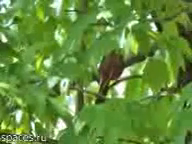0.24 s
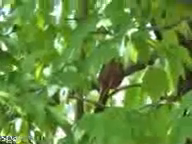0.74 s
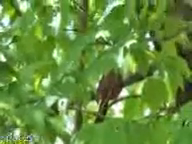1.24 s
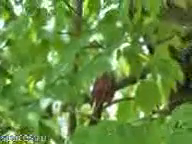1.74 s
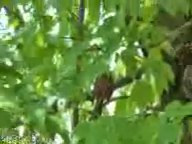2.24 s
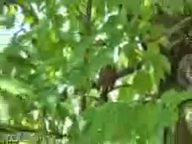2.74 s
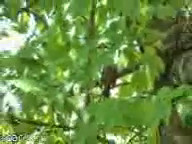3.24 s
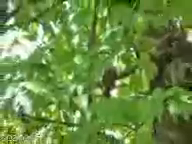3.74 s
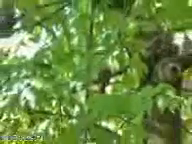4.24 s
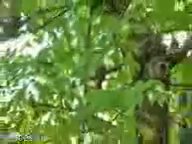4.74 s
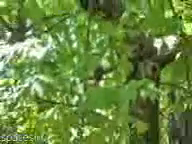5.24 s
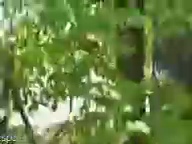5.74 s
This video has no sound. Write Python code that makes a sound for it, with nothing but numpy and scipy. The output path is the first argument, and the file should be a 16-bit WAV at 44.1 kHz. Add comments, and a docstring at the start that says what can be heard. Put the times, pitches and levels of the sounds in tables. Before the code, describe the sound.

Soft distant rumble and rustling leaves, with brief far yelps at the start. After about a second a loud, clear bird begins: three high whistled slurs, then six lower ones at a steady faster pace, with short woodland echoes. Dull knocks on the handheld microphone interrupt lightly midway. As the song finishes, a breathy hiss swells, brightens and dies away.

```python
"""Cardinal in a leafy tree

A cardinal close to the microphone sings nine slurred whistles: three high opening ones, then six lower, quicker ones.
Each is a low rising tone from one side of the syrinx and a falling slur from the other; trunks and leaves scatter them.
Far off are three yelps and filtered-noise rumble and rustle, with a faint hum; housing bumps ring in damped modes.
Two twigs tick as short bursts of noise, and a hiss of resonant noise swells after the song."""
import sys
import numpy as np
from scipy import signal
from scipy.fft import rfft, irfft
from scipy.io import wavfile
from scipy.ndimage import uniform_filter1d, map_coordinates

SR = 44100
rng = np.random.default_rng(int(sys.argv[2]) if len(sys.argv) > 2 else 0)


def dump(signal):
    """Clip the signal to [-1, 1] and save it as 16-bit WAV at the path in sys.argv[1]."""
    limited = np.clip(np.atleast_2d(signal).T, -1, 1)
    pcm = np.round(limited * 32767).astype(np.int16)
    wavfile.write(sys.argv[1], SR, pcm)


N = 262747
T = np.arange(N) / SR


def undb(db):
    """Decibels to gain."""
    return 10 ** (np.asarray(db) / 20)


def unit(x):
    """Scale to rms 1."""
    return x / np.sqrt(np.mean(x ** 2))


def curves(rows, at):
    """Every column of a table after the first, joined by straight lines."""
    first, *columns = np.transpose(rows)
    return [np.interp(at, first, column) for column in columns]


def smooth(x, seconds):
    """Round the corners of a control with two moving averages."""
    size = max(int(seconds * SR), 1)
    once = uniform_filter1d(x, size, mode="nearest")
    return uniform_filter1d(once, size, mode="nearest")


def walk(rate_hz, count=N):
    """Slow chance with a spread near 1: random points joined by straight lines."""
    at = np.arange(count) * rate_hz / SR
    return np.interp(at, np.arange(2048), rng.standard_normal(2048))


def band(x, hz, width_hz):
    """One resonance, gain 1 at its centre."""
    return signal.lfilter(*signal.iirpeak(hz, hz / width_hz, fs=SR), x)


def fade(t, t60):
    """Exponential decay that falls 60 dB in t60 seconds."""
    return np.exp(-np.log(1000) * t / t60)


def hump(x, centre, width):
    """A bell curve of height 1."""
    return np.exp(-((x - centre) / width) ** 2)


def ramp(x, start, end):
    """A straight climb from 0 to 1."""
    return np.clip((x - start) / max(end - start, 1e-6), 0, 1)


def add(out, start, x):
    """Mix a short sound in at its time, cutting off what falls outside."""
    i = int(start * SR)
    x, i = x[max(-i, 0):], max(i, 0)
    out[i:i + len(x)] += x[:N - i]


# Spectrum of the distant outdoor noise: (frequency [Hz], relative density [dB])
AIR_SPECTRUM = [(30, -28), (60, -22.5), (112, -8), (170, -7.5), (240, -5), (450, -4.5), (814, -6.5),
                (1750, -9), (2490, -17), (2850, -17.5), (3400, -22), (5000, -23), (5800, -43), (6600, -50),
                (8000, -80.5)]
# Swells of the faint hum, before its flicker: (start [s], length [s], rms level [dB])
HUM_SWELLS = [(2.255, 0.95, -66), (4.613, .3, -58.5), (5.51, .6, -57)]


def outdoors(rumble_hz=580, rustle_hz=1300, flicker_db=3.0, air_db=-51, hum_hz=117, hum_edge_s=0.056):
    """Distant rumble, middle and leaf rustle: bands of one noise that drift apart, with an unsteady hum."""
    hz, db = np.transpose(AIR_SPECTRUM)
    f = np.fft.rfftfreq(N, 1 / SR) + 1
    colour = undb(np.interp(np.log(f), np.log(hz), db))
    air = undb(air_db) * unit(irfft(rfft(rng.standard_normal(N)) * colour, N))

    # Split at the two edges
    spectrum = rfft(air)
    rumble, body = (irfft(spectrum / (1 + (f / edge) ** 10), N) for edge in (rumble_hz, rustle_hz))
    middle, rustle = body - rumble, air - body

    # The rumble grows, the middle sinks, the leaves rustle in one slow gust
    rumble_db = 0.2 + 0.7653 * T
    middle_db = 2.5 - 1.4 * T
    rustle_db = -2.5 + 6 * hump(T, 2.83, 1.9)
    layers = (rumble, rumble_db), (middle, middle_db), (rustle, rustle_db)
    noise = sum(part * undb(level_db + flicker_db * walk(8)) for part, level_db in layers)

    hum_phase = 2 * np.pi * np.cumsum(hum_hz * (1 + .02 * walk(26))) / SR
    swells = np.zeros(N)
    for start, length, level_db in HUM_SWELLS:
        from_edge = np.minimum(T - start, start + length - T)
        swells += undb(level_db) * ramp(from_edge, 0, hum_edge_s)
    return noise + np.sqrt(2) * np.sin(hum_phase) * swells * undb(2 * walk(9.8))


def rise(length, top_hz, db, climb_hz, hold, crest, bend, base_db,
         attack, attack_db, accent_db, accent_at, accent_width):
    """Pitch and level of a note that starts low and climbs to its top, with one accent or dip in level."""
    u = np.linspace(0, 1, int(length * SR))
    hz = top_hz - climb_hz * (1 - ramp(u, hold, crest) ** bend)
    onset_db = -attack_db * (1 - ramp(u, 0, attack))
    return hz, db + base_db + onset_db + accent_db * hump(u, accent_at, accent_width)


def whistle(hz, db, hoarse, hoarse_s=0.02, waver=0.0057, wobble=0.0052, wobble_db=3.5,
            overtone_db=-39, beak_hz=4900, beak_width_hz=800):
    """A nearly pure tone from vibrating membranes that follows its pitch and level, never twice quite alike."""
    t = T[:len(hz)]
    hz = smooth(hz, 0.0033) * (1 + wobble * walk(58.8, len(t)))
    # The membranes flutter as they start, then settle
    flutter = hoarse * hump(t, 0, hoarse_s) * walk(900, len(t))
    unsteady_hz = hz * (1 + flutter + waver * walk(250, len(t)))
    phase = 2 * np.pi * np.cumsum(unsteady_hz) / SR
    from_edge = np.minimum(t, t[-1] - t)
    edges = np.sin(np.pi / 2 * ramp(from_edge, 0, 0.0027)) ** 2
    # Overtones get out only while they cross the resonance of the beak
    overtones = sum(hump(k * hz, beak_hz, beak_width_hz) * np.sin(k * phase) for k in (2, 3))
    loudness = undb(db + wobble_db * walk(90.3, len(t)))
    return np.sqrt(2) * loudness * edges * (np.sin(phase) + undb(overtone_db) * overtones)


# Far yelps: (start [s], length [s], top pitch [Hz], level before the yelp's shape [dB])
YELPS = [(-.06, 0.063, 1923, -33.5), (0.248, 0.066, 1899, -41), (1.226, 0.06, 1854, -45.5)]
# Shape of a yelp, which breaks upwards and is weakest in the break: climb_hz [Hz], bend [power],
# hold, crest, attack, accent_at, accent_width [shares of the note], base_db, attack_db, accent_db [dB]
YELP_RISE = dict(climb_hz=345.3, hold=.15, crest=.76, bend=1, base_db=-1.5, attack=0.092, attack_db=-1.5, accent_db=-14.5, accent_at=0.57, accent_width=0.19)


def yelps():
    """Short upward calls from further off; flutter makes them hoarse at first, then they clear at the top."""
    out = np.zeros(N)
    for start, length, top_hz, db in YELPS:
        hz, level_db = rise(length, top_hz, db, **YELP_RISE)
        add(out, start, whistle(hz, level_db, hoarse=0.13, hoarse_s=0.063))
    return out


# Echoes off the ground and trunks, relative to the direct sound: (delay [s], level [dB])
ECHOES = [(.0033, -24.5), (.0049, -18), (0.0102, 0), (.0115, -14), (0.017, -7.5), (0.027, -17.5),
          (.047, -17.5), (.108, -20)]


def trees(x, near_db, far_db, near_t60=0.22, far_t60=0.77):
    """Direct sound, a few distinct echoes, quick scatter from close leaves and a long tail from the wood."""
    t = T[:SR]
    near, far = rng.standard_normal((2, SR))
    near = near * fade(t, near_t60) * (1 - np.exp(-t / 0.027))
    far = far * fade(t, far_t60) * (1 - np.exp(-t / 0.059))
    response = undb(near_db) * near / np.linalg.norm(near)
    response += undb(far_db) * far / np.linalg.norm(far)
    response[0] += 1  # direct sound
    for delay, db in ECHOES:
        response[int(delay * SR)] += undb(db)
    return signal.fftconvolve(x, response)[:N]


def slur(from_hz, db, ease, length_s, leap_hz, fall_hz, flick_hz, flick_s, hoarse, base_db,
         attack_db, crest_db, swell_db, swell_at, swell_width):
    """Pitch, level and hoarseness of a note that leaps, flicks up to a crest and falls ever more gently."""
    crest_share, crest_width = .17, 0.09  # of the note
    u = np.linspace(0, 1, int(length_s * SR))
    starting = 1 - ramp(u * length_s, 0, flick_s)
    fallen = 1 - (1 - ramp(u, crest_share, 0.99)) ** ease
    hz = from_hz + leap_hz - flick_hz * starting - fall_hz * fallen
    crest = crest_db * hump(u, crest_share, crest_width)
    swell = swell_db * hump(u, swell_at, swell_width)
    # Louder slurs start hoarser; -27.5 dB leaves the kind's own hoarseness
    return hz, db + base_db - attack_db * starting + crest + swell, hoarse * undb(db + 27.5)


# Kinds of rise, whose pitch holds and then climbs; the fields and units are those of YELP_RISE
RISE_KINDS = {"swept": dict(climb_hz=458.6, hold=.1, crest=0.95, bend=.87, base_db=-9, attack=0.43, attack_db=11.5, accent_db=8.5, accent_at=0.837, accent_width=0.076),
              "held": dict(climb_hz=210.3, hold=.38, crest=.93, bend=1.5, base_db=-5, attack=0.32, attack_db=21.5, accent_db=4, accent_at=1, accent_width=.07)}
# Kinds of slur: length_s, flick_s [s], leap_hz, fall_hz, flick_hz [Hz], hoarse [share of pitch],
# base_db, attack_db, crest_db, swell_db [dB], swell_at, swell_width [shares of the note]
SLUR_KINDS = {"opening": dict(length_s=.123, leap_hz=1532, fall_hz=1013, flick_hz=480, flick_s=0.016, hoarse=.045, base_db=-9.5, attack_db=2.5, crest_db=8.5, swell_db=9.5, swell_at=.86, swell_width=0.12),
              "main": dict(length_s=.128, leap_hz=1440, fall_hz=1261, flick_hz=520, flick_s=0.01, hoarse=.022, base_db=-6.5, attack_db=1.5, crest_db=-2.5, swell_db=6.5, swell_at=0.64, swell_width=0.12)}
# Song: (slur start [s], top pitch of the rise [Hz], kind of rise, rise length [s], rise level before
# its kind [dB], kind of slur, slur level before its kind [dB], easing of the fall [power])
SYLLABLES = [(1.282, 2131, "swept", 0.077, -29.5, "opening", -33.5, 1.9),
             (1.808, 1982, "held", 0.14, -28, "opening", -29.5, 1.23),
             (2.209, 1969, "held", .138, -27.5, "opening", -28.5, 1.25),
             (2.553, 1791, "swept", 0.073, -28, "main", -25.5, 1.65),
             (2.906, 1700, "swept", 0.1, -30.5, "main", -26.5, 1.31),
             (3.263, 1690, "swept", 0.1, -32, "main", -27, 1.42),
             (3.622, 1708, "swept", .1, -33, "main", -27.5, 1.35),
             (4.000, 1708, "swept", 0.078, -31.5, "main", -28.5, 1.37),
             (4.37, 1655, "swept", 0.078, -36, "main", -31, 1.35)]


def cardinal(pause_s=.011):
    """The two sides of the syrinx take turns: one rises, the other slurs down from above."""
    out = np.zeros(N)
    for at, top_hz, rise_kind, rise_s, rise_db, slur_kind, slur_db, ease in SYLLABLES:
        hz, db = rise(rise_s, top_hz, rise_db, **RISE_KINDS[rise_kind])
        add(out, at - pause_s - rise_s, whistle(hz, db, hoarse=.004))
        hz, db, hoarse = slur(top_hz, slur_db, ease, **SLUR_KINDS[slur_kind])
        add(out, at, whistle(hz, db, hoarse))
    return out


# Bumps on the housing: (start [s], length [s], firmest contact [dB], brightness [dB per octave])
BUMPS = [(1.931, 0.043, -35, 11), (3.304, .066, -26, -5.5), (3.884, 0.018, -40, 5)]
# Modes of the housing, before scatter and brightness: (frequency [Hz], level [dB], t60 [s])
HOUSING_MODES = [(286, 0, 0.06), (394, -12.5, 0.066), (588, -14, 0.05)]


def handling(low_hz=150, scatter=0.11, unevenness=.25, edge_db=-9, gap_s=.010):
    """Fingers shift in runs of contacts, firmest midway; the housing's modes ring dull and short, without deep bass."""
    out, t = np.zeros(N), T[:SR // 4]
    lowest_hz = HOUSING_MODES[0][0]
    for start, length, db, tilt_db in BUMPS:
        chance = rng.standard_normal((16, 2))
        for delay, (late, detune) in zip(np.arange(0, length, gap_s), chance):
            ring = np.zeros(len(t))
            for hz, mode_db, t60 in HOUSING_MODES:
                gain = undb(mode_db + tilt_db * np.log2(hz / lowest_hz))
                ring += gain * np.sin(2 * np.pi * hz * (1 + scatter * detune) * t) * fade(t, t60)
            force = undb(db + edge_db * (2 * delay / length - 1) ** 2)
            onset = 1 - np.exp(-t / 0.00045)
            add(out, start + delay + unevenness * late * gap_s, force * ring * onset)
    return signal.sosfilt(signal.butter(2, low_hz, "high", fs=SR, output="sos"), out)


# Twig ticks: (start [s], peak before the leaves dull it [dB], centre [Hz], t60 of the burst [s])
TICKS = [(2.147, -27, 2900, 0.028), (4.748, -34.5, 4270, 0.059)]


def twigs(top_hz=5300):
    """Tiny dry cracks: decaying noise through one broad resonance, dulled by the leaves."""
    out, t = np.zeros(N), T[:SR // 4]
    for start, db, hz, t60 in TICKS:
        burst = rng.standard_normal(len(t)) * fade(t, t60)
        crack = band(burst, hz, 2100)
        add(out, start, undb(db) * crack / np.abs(crack).max())
    return signal.sosfilt(signal.butter(10, top_hz, fs=SR, output="sos"), out)


# Resonances of the hiss, before the drift and each passed twice:
# (centre [Hz], width of one pass [Hz], gain [dB])
HISS_BODY = [(470, 380, -3), (1233, 630, -4.5), (2020, 910, -4.5), (2710, 650, -10)]
HISS_TREBLE = [(4030, 530, 4), (4780, 810, -2.5)]
HISS_SIZZLE = [(5860, 320, 0)]
# Drift of all these resonances: (time [s], frequency ratio)
HISS_DRIFT = [(4.6, .985), (5.3, 1), (5.7, 1.035)]
# Body, treble and sizzle, before the flutter:
# (level on arrival [dB], growth while held [dB per s], fall on release [dB per s])
HISS_LAYERS = [(-47, -3, 34), (-58, 2.2, 28), (-70, 11.5, 30)]


def hiss(start_s=4.537, attack_s=0.12, hold_s=0.81, flutter_db=2.0):
    """Resonant noise comes in quickly, brightens while it holds, then dies away as its resonances creep upwards."""
    # Reading the noise at a changing speed shifts its resonances
    place = np.cumsum(curves(HISS_DRIFT, T)[0])
    t = T - start_s - attack_s
    attack = ramp(t, -attack_s, 0)
    held_s = np.clip(t, 0, hold_s)
    released_s = np.maximum(t - hold_s, 0)
    out = np.zeros(N)
    for resonances, layer in zip((HISS_BODY, HISS_TREBLE, HISS_SIZZLE), HISS_LAYERS):
        level_db, growth, release = layer
        noise = np.zeros(N)
        for hz, width, db in resonances:
            once = band(rng.standard_normal(N), hz, width)
            noise += undb(db) * band(once, hz, width)
        drifting = map_coordinates(unit(noise), [place], order=3, mode="mirror")
        swell_db = level_db + growth * held_s - release * released_s
        out += drifting * attack * undb(swell_db + flutter_db * walk(18))
    return out


def scene():
    """The bird is close; the yelps, further off, carry more scatter."""
    song = trees(cardinal(), near_db=-2.5, far_db=-8)
    far_calls = trees(yelps(), near_db=0.5, far_db=-3.5)
    return (song + far_calls + handling() + twigs() + outdoors() + hiss())[None]


def record(dry, top_hz=7200):
    """A small camera microphone: a steep low-pass filter takes away the top of the treble."""
    return signal.sosfilt(signal.ellip(10, .2, 70, top_hz, fs=SR, output="sos"), dry)


dry = scene()
out = record(dry)
dump(out)
```